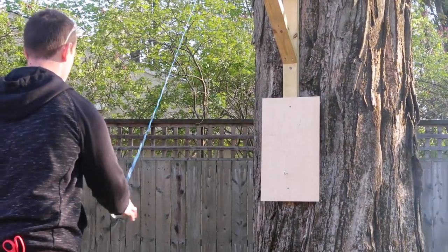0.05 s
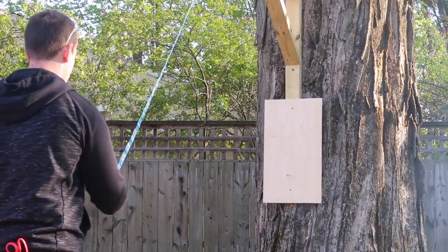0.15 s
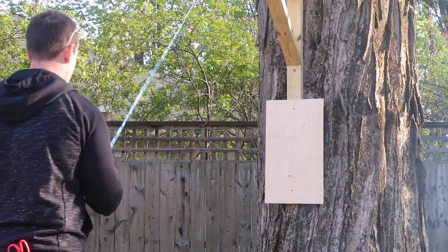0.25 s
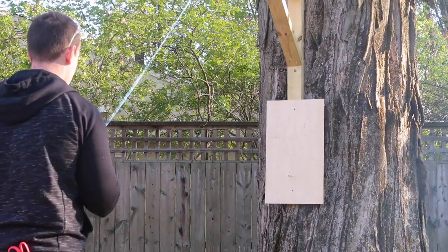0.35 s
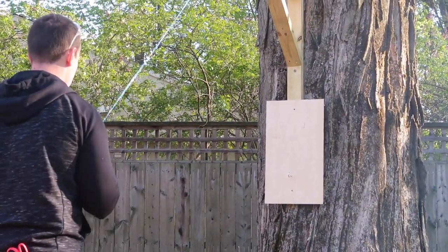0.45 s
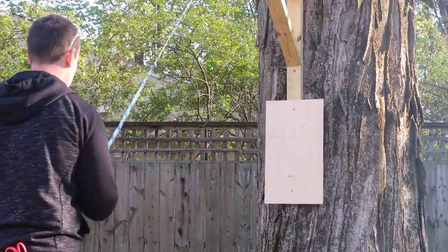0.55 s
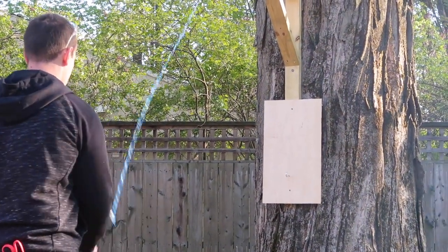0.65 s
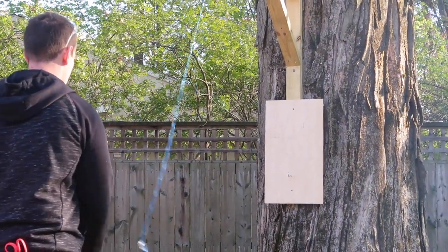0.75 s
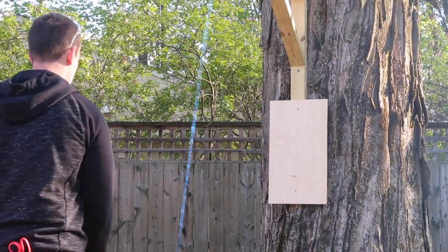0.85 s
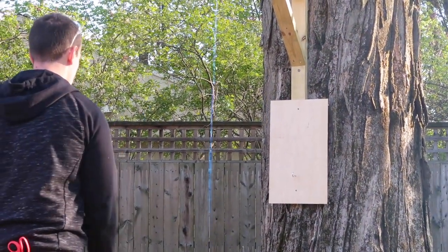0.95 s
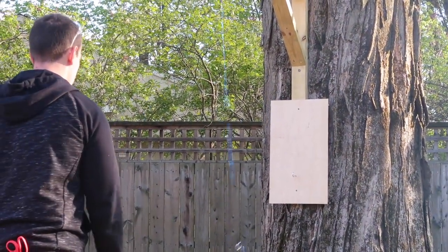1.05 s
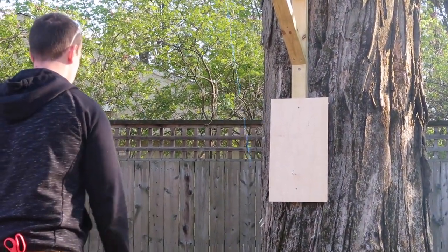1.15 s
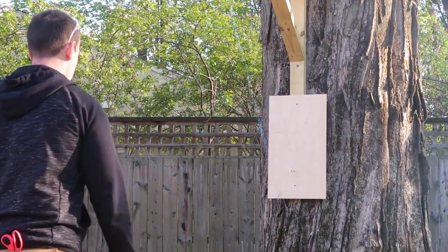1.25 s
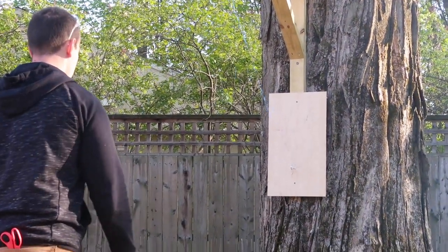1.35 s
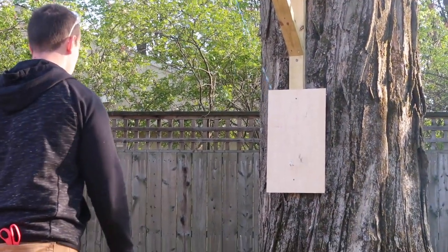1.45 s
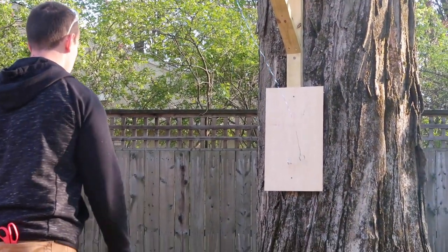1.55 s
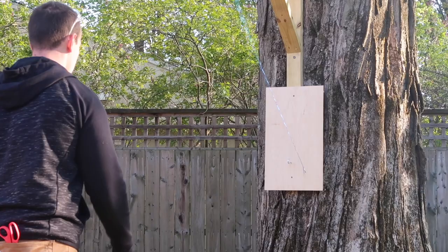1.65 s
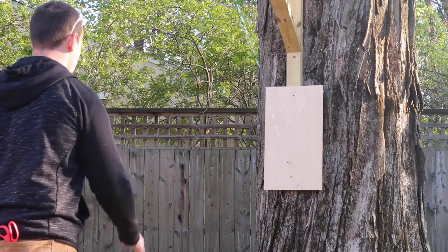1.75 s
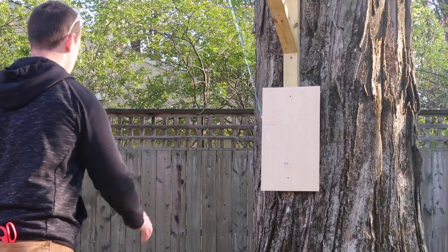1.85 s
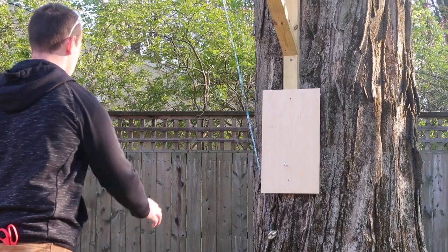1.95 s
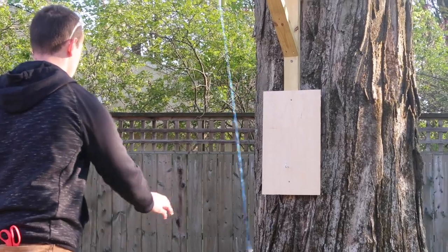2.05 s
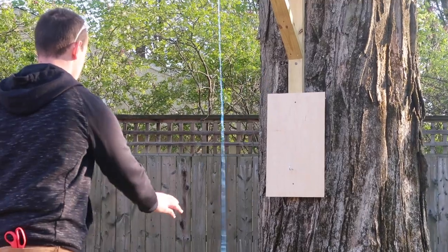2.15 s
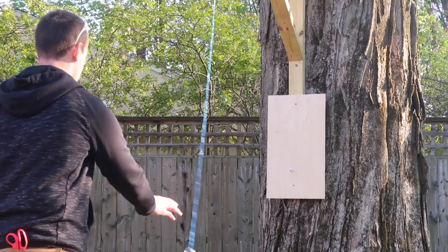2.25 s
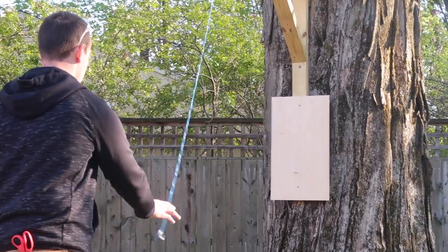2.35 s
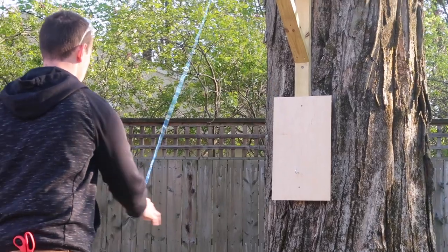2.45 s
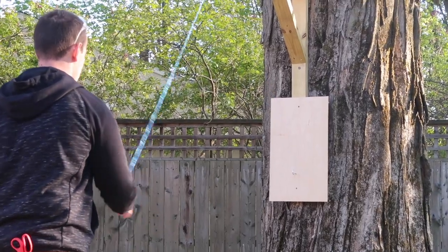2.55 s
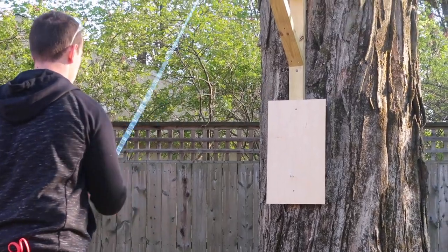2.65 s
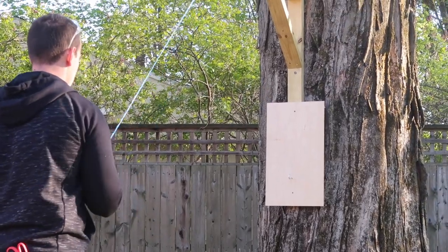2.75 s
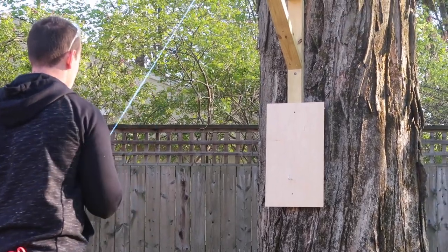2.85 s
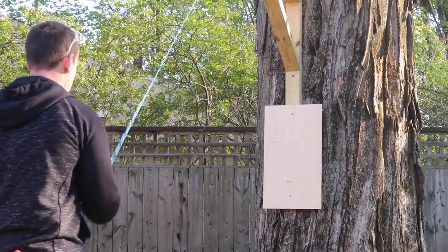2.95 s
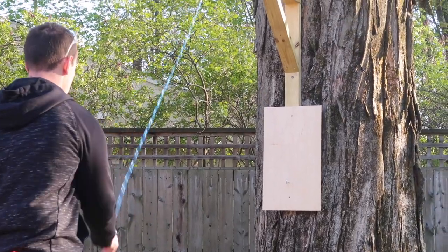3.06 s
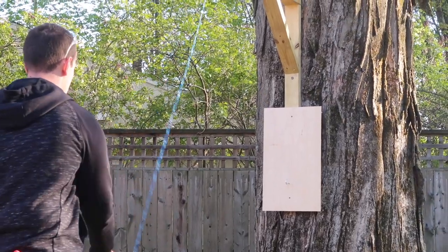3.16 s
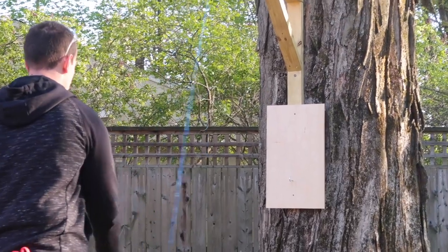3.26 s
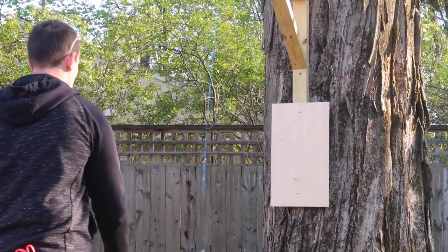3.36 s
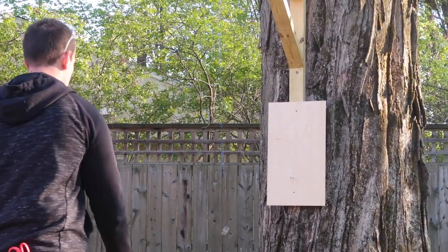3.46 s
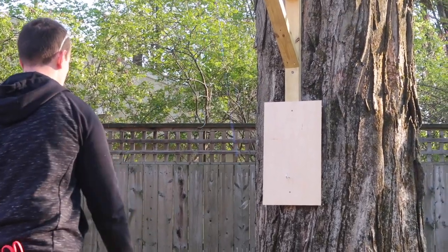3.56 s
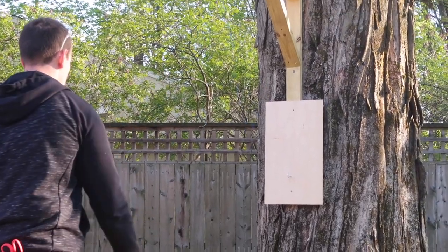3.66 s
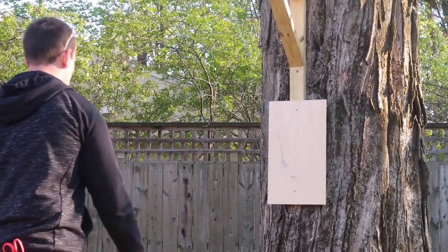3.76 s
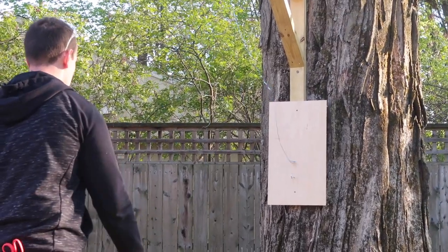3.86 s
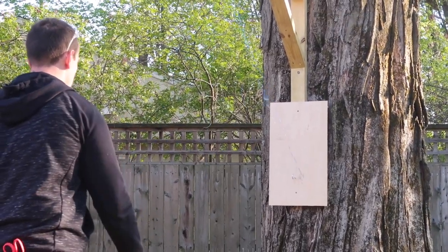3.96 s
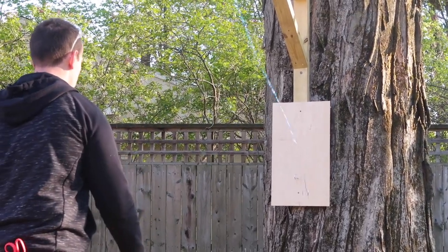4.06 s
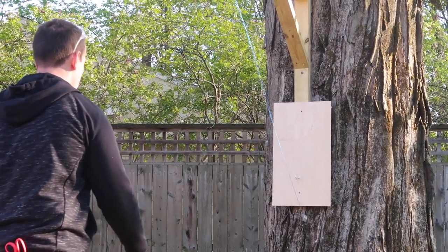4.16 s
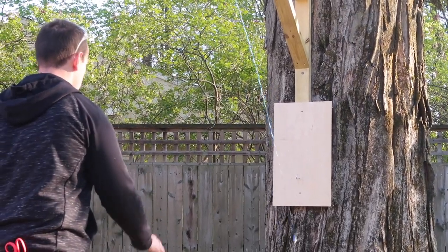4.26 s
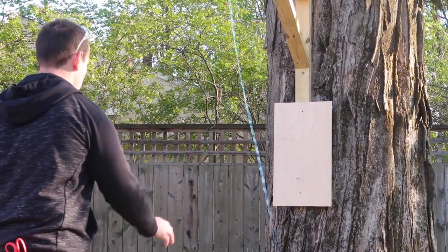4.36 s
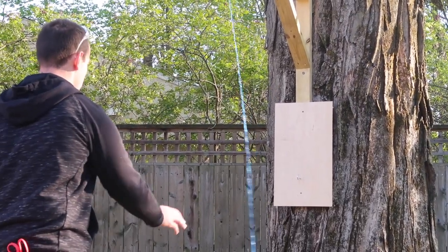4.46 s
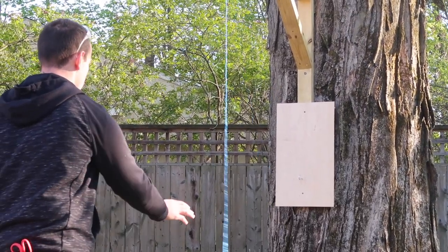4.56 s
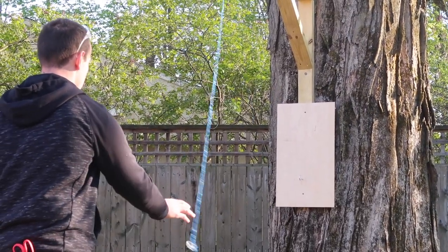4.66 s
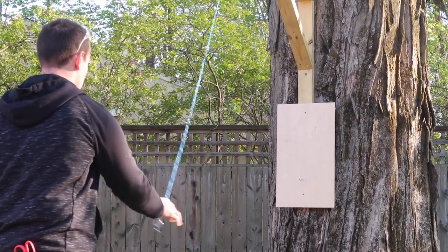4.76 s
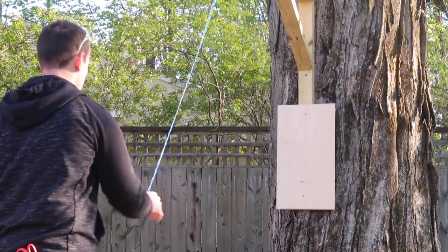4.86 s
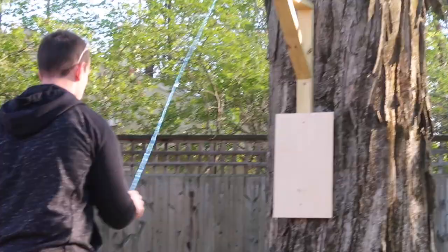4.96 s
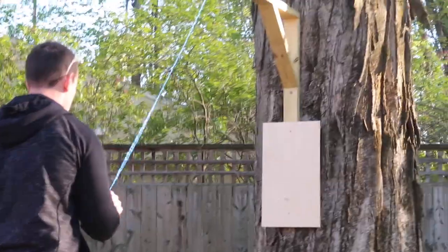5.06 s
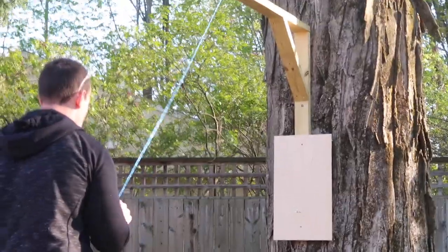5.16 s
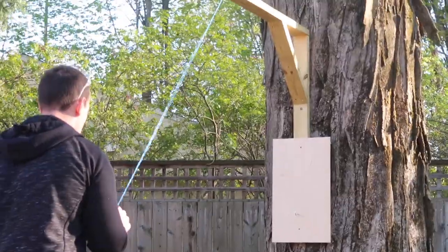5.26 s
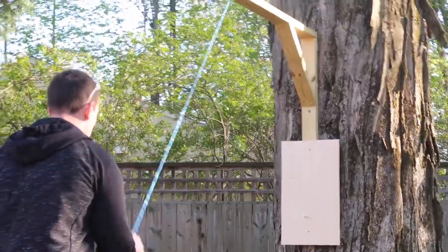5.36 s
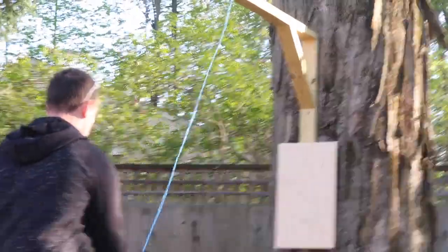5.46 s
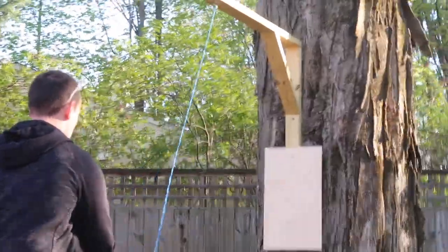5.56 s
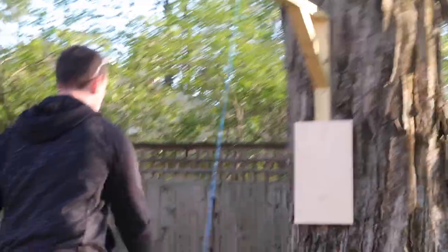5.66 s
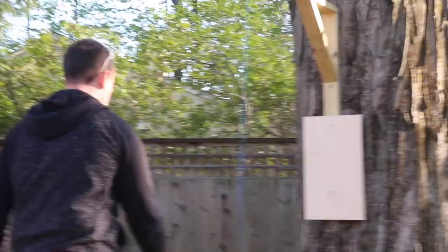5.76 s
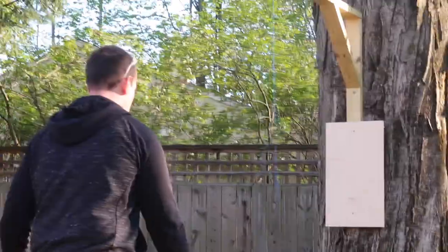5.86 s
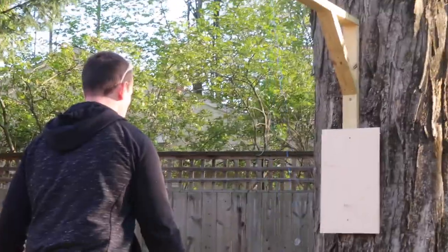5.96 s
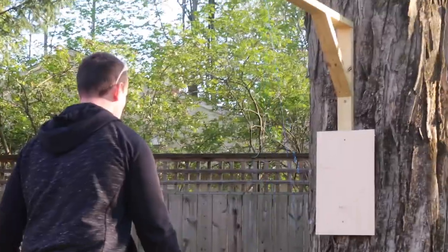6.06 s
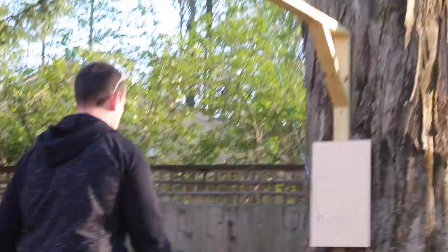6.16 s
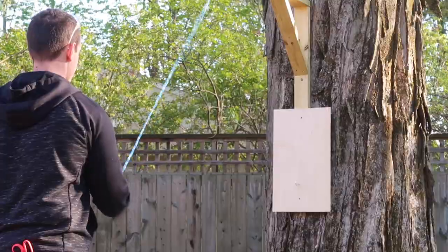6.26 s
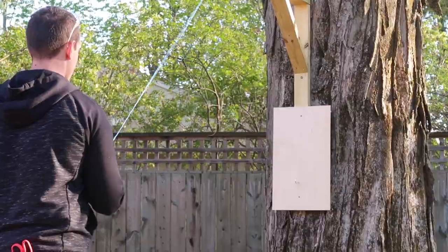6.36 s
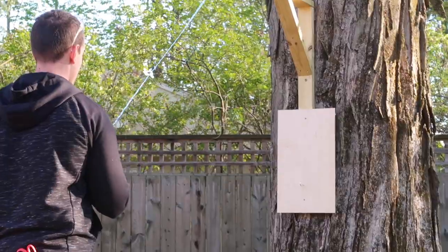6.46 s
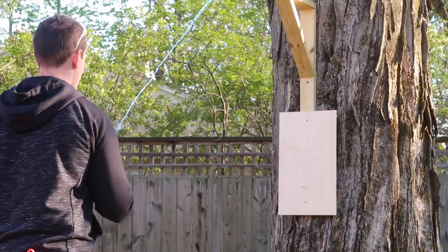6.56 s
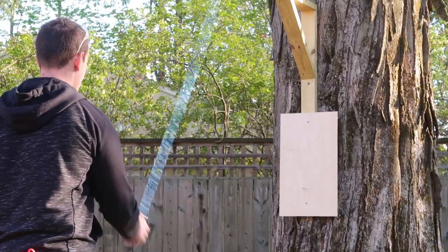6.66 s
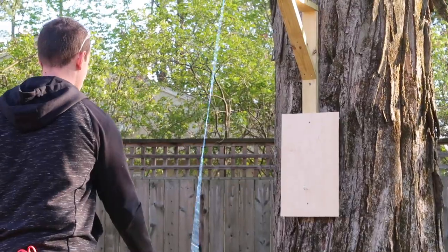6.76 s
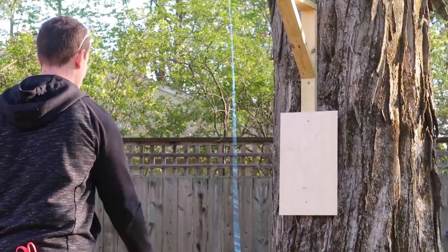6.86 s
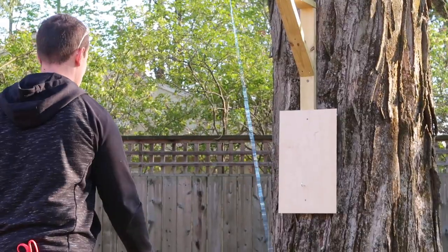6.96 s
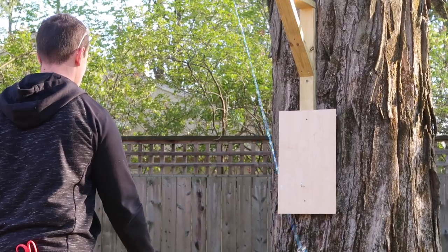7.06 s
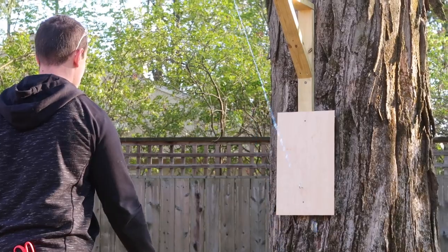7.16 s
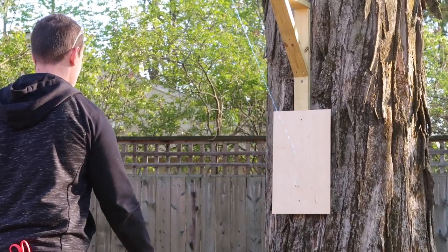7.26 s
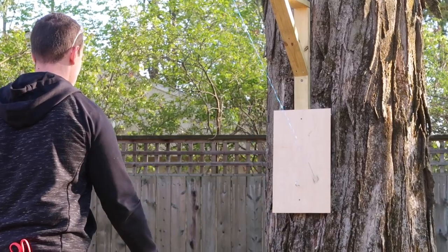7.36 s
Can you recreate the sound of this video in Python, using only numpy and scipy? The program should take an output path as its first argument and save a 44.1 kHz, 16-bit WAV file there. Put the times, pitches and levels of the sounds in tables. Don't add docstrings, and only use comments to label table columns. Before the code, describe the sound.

Two hard woody clacks with short fence echoes, seconds apart, amid low traffic hum, tiny ticks and soft steps, then a nearby motor runs.

```python
import sys
import numpy as np
from scipy import signal
from scipy.fft import rfft, irfft, next_fast_len
from scipy.io import wavfile
from scipy.ndimage import map_coordinates

SR = 44100
rng = np.random.default_rng(int(sys.argv[2]) if len(sys.argv) > 2 else 0)


def output_pcm(signal):
    pcm = np.clip(np.atleast_2d(signal).T, -1, 1) * 32767
    wavfile.write(sys.argv[1], SR, np.round(pcm).astype(np.int16))


def elevation(decibels):
    levels = np.asarray(decibels, float)
    return 10 ** (levels / 20)


N = 326781
T = np.arange(N) / SR


def rms_one(x):
    return x / np.sqrt(np.mean(x ** 2) + 1e-30)


def in_time(rows):
    s, *columns = np.transpose(rows)
    return [np.interp(T, s, c) for c in columns]


def gains(points, size):
    hz, level_db = np.transpose(points)
    grid_hz = np.arange(size // 2 + 1) * SR / size + 1
    return elevation(np.interp(np.log(grid_hz), np.log(hz), level_db))


def coloured(points, size):
    white = rfft(rng.standard_normal(size))
    return np.sqrt(SR / 2) * irfft(white * gains(points, size), size)


def drift(rate):
    knots = rng.standard_normal(int(N / SR * 2 * rate) + 3)
    return rms_one(map_coordinates(knots, [T * (len(knots) - 1) / T[-1]], order=3))


def ring(clicks, hz, t60):
    r, w = elevation(-60 / (t60 * SR)), 2 * np.pi * hz / SR
    return signal.lfilter([0, np.sin(w)], [1, -2 * r * np.cos(w), r * r], clicks + 1e-18)


def resonate(x, hz, width_hz):
    r = np.exp(-np.pi * width_hz / SR)
    feedback = [1, -2 * r * np.cos(2 * np.pi * hz / SR), r * r]
    return signal.lfilter(np.array([1, 0, -1]) * (1 - r * r) / 2, feedback, x)


def ports(x, lag):
    size = len(x) + 64
    turn = np.exp(-1j * np.pi * lag * np.arange(size // 2 + 1) / size)
    return irfft(rfft(x, size) * np.array([turn, 1 / turn]), size)[:, :len(x)]


def stereo(mid, side):
    return np.array([mid + side, mid - side])


def add(out, s, piece):
    i = round(s * SR)
    out[..., i:i + piece.shape[-1]] += piece[..., :N - i]


# pitch_hz, level_db (per Hz)
HUM_MID = [(12, -88), (25, -68), (45, -62.5), (100, -64), (210, -69.5), (300, -75.5), (670, -77.5),
           (1300, -85), (2000, -93), (3000, -99), (6000, -107), (9500, -112), (11500, -117), (16000, -122)]
# pitch_hz, level_db (per Hz)
HUM_SIDE = [(45, -122), (100, -119), (210, -89), (440, -88), (670, -93), (1300, -95), (3000, -101),
            (6000, -106), (9500, -111), (13500, -115), (16000, -122)]
# time_s, level_db; at the end the engine next door lifts it
TRAFFIC = [(0, 1), (1, -0.3), (1.7, 1.3), (2.5, -0.5), (6.2, -0.84), (7.41, 5.5)]


def traffic():
    traffic_db, = in_time(TRAFFIC)
    bass_db = -0.4 + 0.32 * traffic_db
    size = next_fast_len(N)
    mid, side = coloured(HUM_MID, size)[:N], coloured(HUM_SIDE, size)[:N]
    low_passes = [signal.butter(2, hz, fs=SR, output="sos") for hz in (260, 2500)]
    bass, below = (signal.sosfiltfilt(low_pass, mid) for low_pass in low_passes)
    heaving = elevation(bass_db + 1.3 * drift(12.0)) * bass
    passing = elevation(traffic_db + 0.2 * drift(4.2)) * (below - bass)
    return stereo(heaving + passing + mid - below, side)


# pitch_hz, width_hz, level_db
FAR_TONES = [(49.3, 6.2, -1.5), (98.2, 1.4, 3.5), (148.3, 14.4, -0.5)]
# time_s, level_db
IDLING = [(0, -46), (.6, -55), (1.5, -53), (3.5, -56), (4.5, -47.5), (5, -55), (5.7, -51), (7.41, -58)]


def far_idling():
    idling_db, = in_time(IDLING)
    drone = 0
    for hz, width_hz, level_db in FAR_TONES:
        tone = resonate(resonate(rng.standard_normal(N), hz, width_hz), hz, width_hz)
        drone = drone + elevation(level_db) * rms_one(tone)
    return elevation(idling_db) * drone


# time_s, level_db
LEAVES = [(0, -70), (.3, -82), (.5, -76), (.9, -88), (1.35, -73), (2.3, -69), (2.75, -77), (3.5, -74),
          (4.1, -71), (4.5, -78), (4.9, -70), (6.1, -76), (6.3, -87), (7.41, -94)]


def leaves():
    rustle = rms_one(resonate(resonate(rng.standard_normal(N), 12200, 3500), 12200, 3500))
    return stereo(0, elevation(in_time(LEAVES)[0] + 2.1 * drift(8)) * rustle)


# time_s, level_db (of the shaft tones)
EFFORT = [(6.25, -29), (6.3, -30), (6.356, -37), (6.388, -30), (6.564, -37.5), (6.764, -26), (6.862, -33),
          (6.98, -28), (7.41, -24.5)]
# multiple, level_db
SHAFT_TONES = [(1, -26), (2, -29), (3, -9.5), (4, 3), (5, -6.5), (6, -15), (7, -11), (8, -16), (9, -7.5),
               (10, -14.5), (11, -29), (12, -16.5), (13, -22.5), (14, -38), (15, -17.5), (16, -20)]
# pitch_hz, level_db (per Hz)
ROAR = [(60, -63), (150, -57.5), (300, -62), (440, -71), (700, -60.5), (950, -63.5), (1300, -72.5),
        (2000, -78.5), (3000, -90.5), (5000, -115)]


def engine():
    start_s, shaft_hz, hunt_hz = 6.25, 27.5, 0.13
    tone_db, = in_time(EFFORT)
    roar_db = -41 + .05 * (tone_db + 26)
    running, roaring = (np.clip((T - start_s) / rise_s, 0, 1) for rise_s in (0.02, 0.049))
    turn = 2 * np.pi * np.cumsum(shaft_hz + hunt_hz * drift(4.0)) / SR
    tones = 0
    for multiple, level_db in SHAFT_TONES:
        phase = 2 * np.pi * rng.random() + 0.15 * drift(6)
        tones = tones + elevation(level_db + 2.9 * drift(7.4)) * np.sin(multiple * turn + phase)
    size = next_fast_len(N)
    roar, spread = (rms_one(coloured(ROAR, size)[:N]) for _ in range(2))
    wide_roar = stereo(roar, 1.2 * np.gradient(spread) + 0.021 * spread)
    throb = elevation(roar_db + 2) * (1 + 0.12 * np.sin(turn))
    return running * elevation(tone_db - 4) * rms_one(tones) + roaring * throb * wide_roar


# start_s, level_db, first_pitch_hz, last_pitch_hz, length_s
CHIPS = [
    (1.912, -50, 7900, 6870, .028),
    (5.3, -52, 8200, 7100, .027),
]


def bird():
    out, t = np.zeros((2, N)), T[:6000]
    for s, level_db, first_hz, last_hz, length in CHIPS:
        part = np.clip(t / length, 0, 1)
        pitch_hz = first_hz + (last_hz - first_hz) * part ** 2
        chip = np.sin(np.pi * part) * np.sin(2 * np.pi * np.cumsum(pitch_hz) / SR)
        trail = signal.fftconvolve(chip, rng.standard_normal(6000) * np.exp(-t / .03))[:6000]
        add(out, s, elevation(level_db) * ports(chip + elevation(-31) * trail, 2.26))
    return out


# start_s, peak_db, pitch_hz, t60_s (time to fall 60 dB)
FOOTFALLS = [
    (1.757, -30, 100, 0.1),
    (1.784, -26, 97, 0.077),
    (2.714, -29.5, 138, 0.073),
    (2.797, -21.5, 143, 0.062),
    (3.021, -29.5, 148, 0.092),
]


def footfalls():
    out, push = np.zeros(N), np.r_[np.hanning(130) / 50, np.zeros(9000)]
    for s, peak_db, hz, t60 in FOOTFALLS:
        add(out, s, elevation(peak_db) * ring(push, hz, t60))
    return out


# start_s, peak_db, dull_share_db (under 6 kHz)
TICKS = [(0.148, -49, -2), (0.2219, -49.5, -3), (2.5524, -27.5, -5.5), (2.575, -55, -6), (2.687, -54, -3),
         (2.7934, -49, -1), (3.163, -39, -6), (4.0342, -46, -10), (4.7444, -50, 5), (4.877, -47, -3),
         (4.91, -50, 2), (5.1516, -37, 4.5), (5.2154, -51, -5), (5.4, -62, -3), (5.42, -69.5, -3),
         (5.4484, -50, -3), (5.462, -43, 7), (5.7744, -54, -3), (5.8292, -39, 11), (5.875, -50, 6),
         (5.8884, -48, 5), (5.9424, -52, -3), (5.9604, -56, -3), (6.048, -44, 7), (6.5484, -56, -3),
         (6.9484, -45, -17), (6.951, -34, -7)]
# pitch_hz, width_hz, level_db
TICK_BODY = [
    [(4100, 1900, 1.5), (7000, 1800, -20), (2200, 1400, -2)],
    [(11700, 1250, 8), (9260, 4900, -9.5), (14000, 2400, -2)],
]


def ticks():
    out = np.zeros((2, N))
    pan_db = 0.8 * np.array([[-.5], [.5]])
    for s, peak_db, dull_db in TICKS:
        puff = rng.standard_normal(2048) * np.exp(-T[:2048] / .0015)
        dull, bright = (sum(elevation(db) * resonate(puff, hz, w) for hz, w, db in body) for body in TICK_BODY)
        snap = elevation(dull_db) * dull + bright
        add(out, s, elevation(peak_db + 5.5 + pan_db) * ports(snap / np.abs(snap).max(), 1.68))
    return out


# start_s, peak_db, length_s, tilt_db (per octave),
# attack_s
SCUFFS = [(2.576, -48, .005, 5, .0005), (4.092, -35, 0.012, -13, .006),
          (4.137, -29.5, 0.0044, -7.5, 0.00044), (4.147, -38, 0.02, -7.5, .006),
          (4.42, -43.5, .006, -6.5, .0005), (4.879, -62, .004, 4, .0005), (5.05, -53, 0.023, 5, .002)]


def scuffs():
    out, t = np.zeros((2, N)), T[:2048]
    for s, peak_db, length, tilt_db, attack in SCUFFS:
        colour = [(400, -12), (1100, 10.5), (8800, 3 * tilt_db), (15000, 3 * tilt_db - 8), (17000, -60)]
        rub = rms_one(coloured(colour, 2048)) * np.exp(-t / length)
        add(out, s, elevation(peak_db - 5.0) * ports(rub * np.clip(t / attack, 0, 1), 0.96))
    return out


# delay_s, level_db, left_lag_samples
ECHOES = [(.0225, -14, 0.5), (.037, -26, -13), (0.043, -32, -0.19), (.061, -25.5, 8), (.088, -31, -3),
          (.113, -37, 3.4), (.13, -41, -2.6)]
# pitch_hz, level_db, t60_s, side_db (against the middle)
YARD = [(300, -20.5, 0.52, -26), (600, -28.5, 0.15, -39), (1230, -28, 0.47, -22), (1800, -27, 0.41, -6),
        (2600, -24, 0.46, -12), (4800, -24.5, 0.28, -3), (7500, -25, 0.3, 5), (14000, -32, .15, 8)]


def yard(size=24000):
    t, table = T[:size], np.array(YARD)
    paths, scatter = np.zeros((2, size)), 0
    click = np.eye(1, 256, 64)[0]
    for delay, level_db, lag in [(0.00048, 0.0085, 0.63)] + ECHOES:
        add(paths, delay, elevation(level_db) * ports(click, np.clip(lag, -2, 2)))
    rise = np.clip((t - .018) / 0.0021, 0, 1)
    lumps_db = 3.1 * np.interp(t, np.arange(300) / 330, rng.standard_normal(300))
    rise = rise * elevation(lumps_db)
    edges = np.geomspace(220, 16000, 13)
    for low, high in zip(edges, edges[1:]):
        centre = np.log(low * high) / 2
        level_db, t60, side_db = (np.interp(centre, np.log(table[:, 0]), table[:, c]) for c in (1, 2, 3))
        band = signal.butter(2, [low, high], "band", fs=SR, output="sos")
        mid, side = signal.sosfilt(band, rng.standard_normal((2, size)))
        scatter = scatter + elevation(level_db - 13 - 60 * t / t60) * rise * stereo(mid, elevation(side_db) * side)
    return paths, scatter


# start_s, force_db, second_touch_after_s, second_touch_db
BLOWS = [
    (1.5279, -3.5, .00165, 2),
    (3.7857, 2.5, .0016, 1.5),
]
# low_pass_hz, crack_db, crack_length_s
CONTACT = [
    (3500, -15.5, 0.004),
    (3520, -15.5, 0.0022),
]
BOARD_HZ = [318, 405, 446, 488, 560, 629, 700, 750, 790, 908, 961, 1075, 1140, 1184, 1250, 1365, 1452, 1570,
            1790, 2006, 2680, 1650, 3400]
# t60_s, first_knock_db, second_knock_db
BOARD = [(0.53, -20, -31), (0.12, -18.5, -23), (0.053, -17, -18.5), (0.1, -9, -10.5), (0.026, -38, -27),
         (0.16, -23, -23.5), (0.27, -24.5, -27), (0.041, -11.5, -26), (0.033, -55, -58), (0.11, -5.5, -20),
         (0.26, -21, -31), (0.037, -52, -64), (0.035, -20, -8.5), (0.05, -30, -28), (0.16, -29, -55),
         (0.042, -43, -33), (0.11, -24, -21), (0.064, -33, -35), (0.27, -33, -57), (0.028, -29, -23),
         (0.032, -29, -25.5), (0.053, -37, -26.5), (0.024, -21, -27.5)]
# pitch_hz, level_db (per Hz)
CRACK = [(700, -3.5), (1500, 12), (2700, -7.5), (3600, -7.5), (4700, -7.5), (7000, -18), (10000, -34),
         (16000, -42)]
# pitch_hz, t60_s, level_db
STEEL = [
    (10120, .2, -78),
    (11480, .7, -71),
]


def blow(k, size=26000):
    s, force_db, after, second_db = BLOWS[k]
    contact_hz, crack_db, length = CONTACT[k]
    touch, t = np.zeros(size), T[:size]
    touch[[0, round(after * SR)]] = 1, elevation(second_db)

    slap_hz, slap_t60_s = 980, .0056
    slap = ring(ring(touch, slap_hz, slap_t60_s), slap_hz, slap_t60_s)
    modes = 0
    for i, (hz, row) in enumerate(zip(BOARD_HZ, BOARD)):
        modes = modes + (-1) ** i * elevation(row[1 + k]) * ring(touch, hz, row[0])
    modes = signal.lfilter(*signal.butter(1, contact_hz, fs=SR), modes)
    body = modes + 1.05 * slap / np.abs(slap).max()
    body = signal.lfilter(*signal.butter(1, 200, "high", fs=SR), body)

    swell = np.clip(t / .0005, 0, 1) * np.exp(-np.maximum(t - after - .0006, 0) / length)
    crack = elevation(crack_db) * rms_one(coloured(CRACK, size)) * swell
    pulse = np.roll(irfft(gains(CRACK, size), size), 128)
    mean_crack = pulse * np.sqrt(np.sum(crack ** 2) / np.sum(pulse ** 2))

    steel = sum(elevation(level_db) * np.sin(2 * np.pi * hz * t) * elevation(-60 * t / t60) for hz, t60, level_db in STEEL)
    force = elevation(force_db)
    return force * body, force * crack, force * mean_crack, steel


def knocks():
    out, (paths, scatter) = np.zeros((2, N)), yard()
    for k, row in enumerate(BLOWS):
        body, crack, mean_crack, steel = blow(k)
        scattered = elevation(-2.5) * body + elevation(5) * mean_crack
        add(out, row[0] - 64 / SR, signal.fftconvolve((body + crack)[None], paths, axes=1))
        add(out, row[0], signal.fftconvolve(scattered[None], scatter, axes=1))
        add(out, row[0], steel * np.ones((2, 1)))
    return out


def scene():
    background = traffic() + far_idling() + leaves()
    return background + engine() + bird() + footfalls() + ticks() + scuffs() + knocks()


def top_cut(x):
    return signal.sosfilt(signal.butter(12, 15300, fs=SR, output="sos"), x)


def record(dry):
    over_db = np.maximum(20 * np.log10(np.abs(dry).max(axis=0) + 1e-9) + 12, 0)
    held_db = np.maximum.accumulate(over_db + 16 * T) - 16 * T
    quick = np.exp(-1 / (0.0019 * SR))
    cut_db = 0.29 * signal.lfilter([1 - quick], [1, -quick], held_db)
    x = elevation(-cut_db) * dry * elevation(np.array([[-0.1], [0.1]]))
    x = np.where(x < 0, 1.134 * np.tanh(x / 1.075), 1.053 * np.tanh(x / 0.89))
    whine_hz, whine_db = 13006, -86
    x = x + elevation(whine_db + 1.5 * drift(30.0)) * 2 * np.sin(2 * np.pi * whine_hz * T)
    return top_cut(x)


dry = scene()
out = record(dry)
output_pcm(out)
```